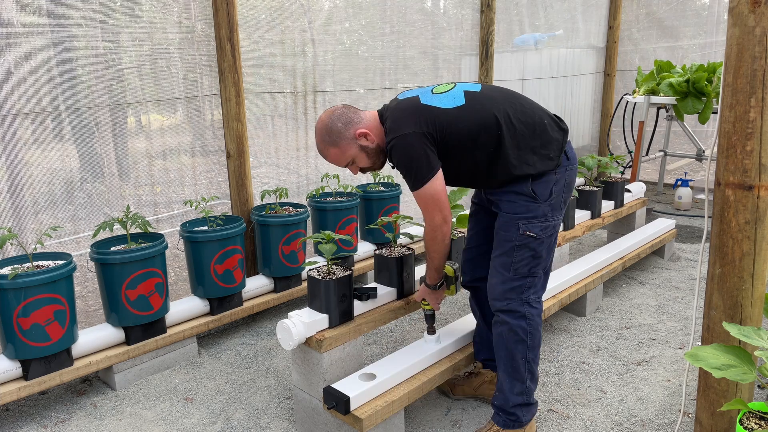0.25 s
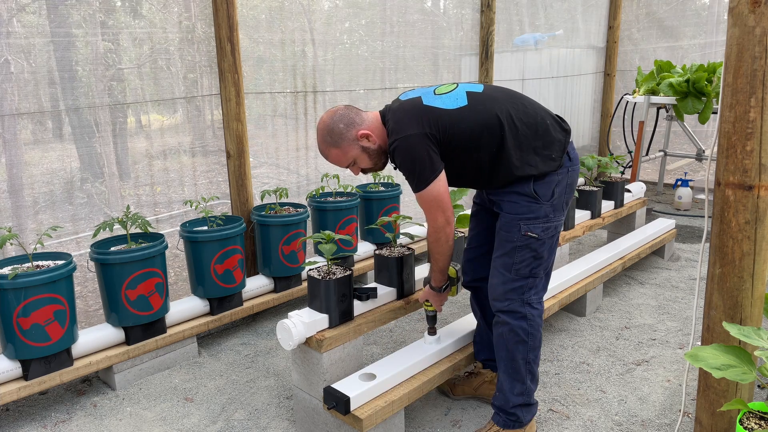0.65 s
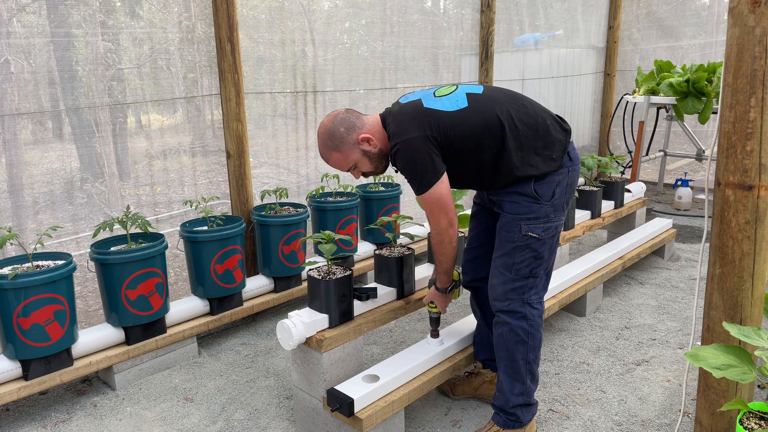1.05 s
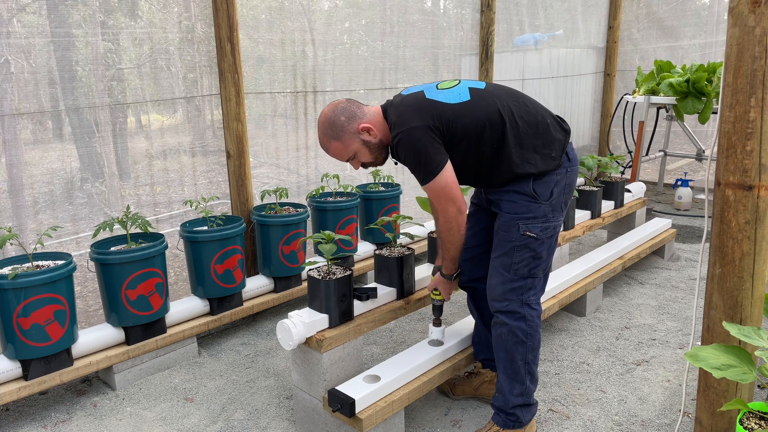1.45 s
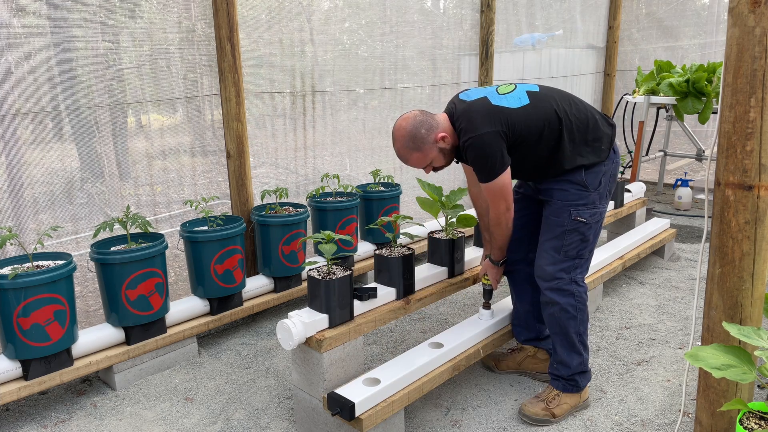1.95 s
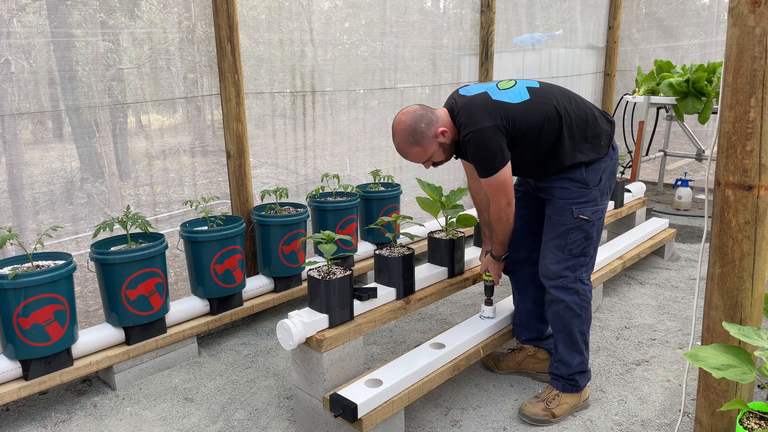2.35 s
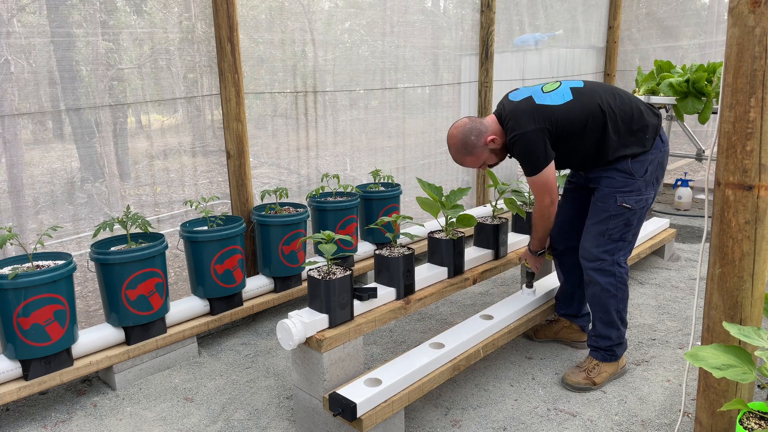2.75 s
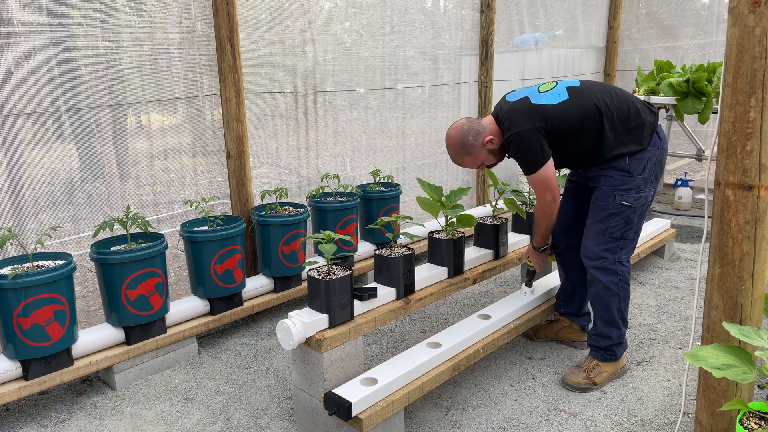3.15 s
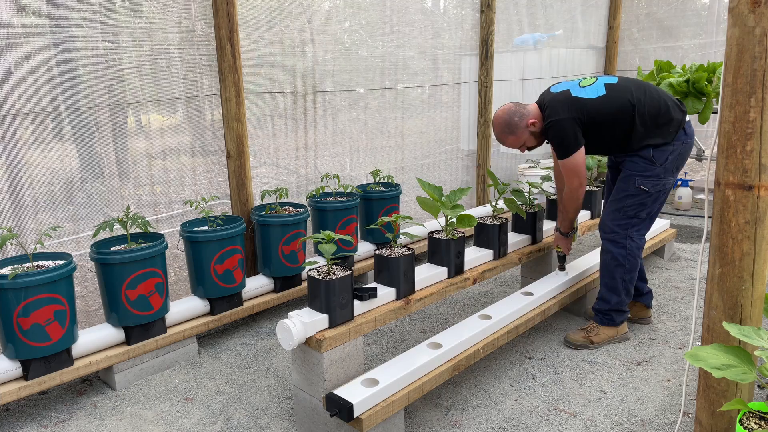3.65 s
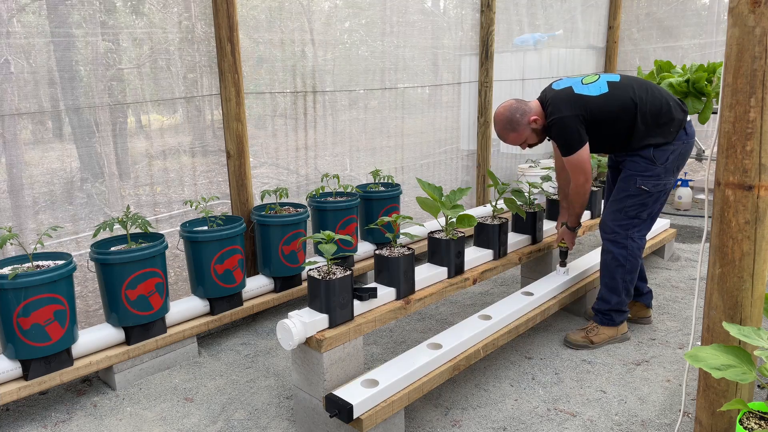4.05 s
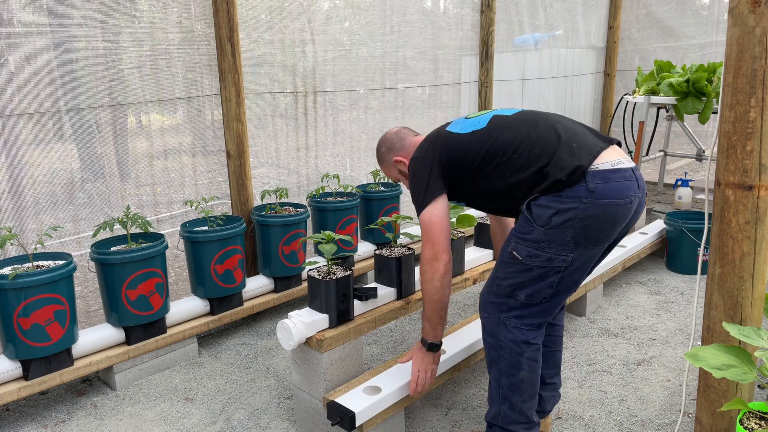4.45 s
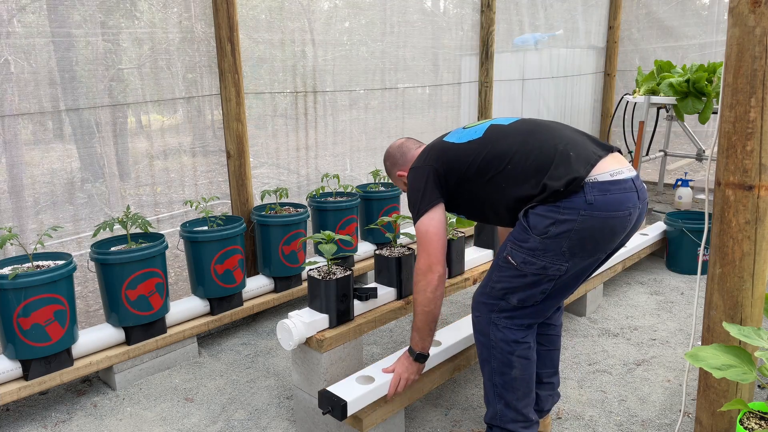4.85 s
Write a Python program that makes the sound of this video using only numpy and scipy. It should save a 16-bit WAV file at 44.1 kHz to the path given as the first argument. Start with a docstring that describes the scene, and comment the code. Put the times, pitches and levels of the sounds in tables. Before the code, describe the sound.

A cordless drill drives a hole saw through plastic pipe four times in a greenhouse. Each run starts abruptly with rasping teeth and hollow drumming, breaks through into a free whine, then slows and stops with a metallic clack. Afterwards a boot scuffs gravel, clothes rustle and the pipe shifts with dull bumps. Faint birds and a low pump hum sit over soft outdoor air.

```python
"""A cordless drill with a hole saw cuts four holes in a plastic pipe in a greenhouse.
Each run starts abruptly, mid-cut: the teeth rasp and drum on the hollow pipe, then break through.
The motor runs free, slows, and the spindle lock (the catch that holds the shaft still) clacks.
After the last hole a hand shifts the pipe, a boot scuffs the gravel, clothes rustle and a small
pump's hum fades in. Faint birds call, mostly near the end; soft outdoor air is heard throughout."""
import sys
import numpy as np
from scipy import signal
from scipy.fft import rfft, irfft, next_fast_len
from scipy.io import wavfile

SR = 44100
rng = np.random.default_rng(int(sys.argv[2]) if len(sys.argv) > 2 else 0)


def master_out(mix):
    """Clip the mix to full scale and print it as 16-bit PCM to the path in sys.argv[1]."""
    frames = np.transpose(np.atleast_2d(mix))
    ceiling = np.clip(frames, -1, 1)
    pcm = np.round(ceiling * 32767).astype(np.int16)
    wavfile.write(sys.argv[1], SR, pcm)


N = 225351
T = np.arange(N) / SR

# Levels in all tables are relative; fade_s is the time a sound takes to fall by 60 dB.
# each hole: start_s, through_s, throb_db, cup_db, judder_db, mesh_db, whine_db, vent_db
HOLES = [(0.148, 0.885, 2.5, -25, -8.5, -14, -10.5, -15), (1.615, 1.972, -1, -27, 2.5, -8, -14.5, -30.5),
         (2.514, 2.822, 0.5, -1.5, -0.5, -6.5, -21, -29.5), (3.348, 3.55, -0.5, -19, -4, -18, -14.5, -25.5)]
# a boot on gravel: start_s, level_db, fade_s
STEPS = [(4.115, -37.5, 0.2), (4.14, -44, 0.21), (4.168, -30, 0.14), (4.196, -41.5, 0.091),
         (4.23, -55, 0.97)]
MESH_ORDER = 12  # gear teeth meet this often per motor turn, making the "mesh" tone


def amp(db):
    """Turn decibels into a gain."""
    return 10 ** (np.asarray(db) / 20)


def unit(x):
    """Scale x to an average (rms) level of 1."""
    return x / np.sqrt(np.mean(x ** 2) + 1e-20)


def along(points, hz):
    """Read between (pitch_hz, value) points on a log pitch scale."""
    pitches, values = np.transpose(points)
    return np.interp(np.log(hz + 1), np.log(pitches + 1), values)


def wobble(rate):
    """A wandering curve through `rate` random points a second."""
    knots = rng.standard_normal(4096)
    return np.interp(T * rate, np.arange(len(knots)), knots)


def filtered(x, response):
    """Scale each frequency in x by response(hz)."""
    size = next_fast_len(N + SR // 4)
    return irfft(rfft(x, size) * response(np.fft.rfftfreq(size, 1 / SR)), size)[:N]


def noise(spectrum):
    """Noise with a (pitch_hz, level_db) tone colour."""
    return unit(filtered(rng.standard_normal(N), lambda hz: amp(along(spectrum, hz))))


def resonate(x, modes, low_hz=190):
    """Let x ring in a body too small to give off bass."""
    def response(f):
        body = sum((-1) ** k * amp(db) * 1j * f * width / (hz * hz - f * f + 1j * f * width)
                   for k, (hz, width, db) in enumerate(modes))
        bass_cut = (f * f / (low_hz ** 2 - f * f + 1j * f * low_hz)) ** 2
        return body * bass_cut
    return filtered(x, response)


def dying(start, fade_s, rise_s=0.0027):
    """Silence until start, a quick rise, then a fade."""
    age = np.maximum(T - start, 0)
    return (1 - np.exp(-age / rise_s)) * amp(-60 * np.minimum(age / fade_s, 3))


def air_and_pump():
    """Outdoor air rushes softly; a pump's hum fades in from the first scuff of the boot."""
    pump = [(64.6, -67), (96.9, -65), (129.2, -76), (161.5, -85), (183.0, -67.5)]  # tones of the hum: pitch_hz, level_db
    air = [(15, -27.5), (25, -16), (102, -7.5), (236, -15.5), (659, -16.5), (1610, -28), (2550, -24.5),
           (4030, -27), (4490, -26.5), (4870, -30.5), (10400, -38), (16000, -43)]  # colour of the air: pitch_hz, level_db
    hum = sum(amp(db + wobble(4.2)) * np.sin(2 * np.pi * hz * T) for hz, db in pump)
    fade_in = np.clip((T - STEPS[0][0]) / 0.55, 0, 1)
    return amp(-60 + wobble(1.75)) * noise(air) + hum * fade_in


def greenhouse(x):
    """The short echo of x from the plastic walls."""
    room = [(200, 0.47), (1000, 0.28), (4000, 0.16), (14000, 0.11)]  # length of the echo: pitch_hz, fade_s
    hz, t, spectra = signal.stft(rng.standard_normal(SR // 2), SR, nperseg=256)
    tail = signal.istft(spectra * amp(-60 * t / along(room, hz)[:, None]), SR, nperseg=256)[1]
    return signal.fftconvolve(np.pad(x, (300, 0)), tail / np.linalg.norm(tail))[:N]


def birds(blur=0.0155, octave_db=-14):
    """Faint gliding whistles from outside, each with a weak octave."""
    calls = [(2.411, 0.041, 2850, 3940, -56), (4.239, .12, 4440, 4300, -64),
             (4.365, 0.23, 10400, 10200, -73), (4.56, 0.13, 2850, 3470, -67),
             (4.608, 0.19, 3470, 4100, -61.5), (4.773, .25, 10370, 10150, -78),
             (4.94, 0.13, 4530, 4370, -69)]  # whistles: start_s, length_s, from_hz, to_hz, level_db
    out = np.zeros(N)
    for start, length, from_hz, to_hz, db in calls:
        progress = np.clip((T - start) / length, 0, 1)
        pitch = (from_hz + (to_hz - from_hz) * progress) * (1 + blur * wobble(340))
        phase = 2 * np.pi * np.cumsum(pitch) / SR
        out += amp(db) * np.sin(np.pi * progress) * (np.sin(phase) + amp(octave_db) * np.sin(2 * phase))
    return out


def worker(crunch_db=3, rustle_db=-1):
    """A boot crunches on gravel; clothes rustle as the worker straightens and reaches."""
    gravel = [(41, -57), (70, -28), (275, -6.5), (441, -13), (661, 1), (1520, -14), (1820, -20),
              (2600, -15), (2780, -20), (3730, -20.5), (5710, -29), (15000, -41.5)]  # colour of the crunch: pitch_hz, level_db
    cloth = [(880, -3.5), (1500, -15), (2550, -14), (3030, -8), (3270, -2.5), (3670, -6.5), (4860, -17),
             (9180, -28), (10400, -24), (15000, -33)]  # colour of the rustle: pitch_hz, level_db
    moves = [(4.321, 0.114, -63), (4.623, 0.084, -55.5), (4.878, 0.24, -73.5)]  # body movements: middle_s, half_length_s, level_db
    stepping = sum(amp(db) * dying(start, fade_s) for start, db, fade_s in STEPS)
    crunch = unit(noise(gravel) * amp(crunch_db * wobble(400)))
    moving = sum(amp(db + rustle_db) * np.exp(-((T - middle) / half) ** 2) for middle, half, db in moves)
    rustle = unit(noise(cloth) * amp(2.5 * wobble(70)))
    return stepping * crunch + moving * rustle


def knocks(events, modes, gain_db, rattle, rattle_s):
    """Blows ring the pipe, each with a short rattle where it is hit."""
    blows = np.zeros(N)
    for start, db in events:
        blows[round(start * SR)] += amp(db)
        blows += amp(db) * rattle * dying(start, rattle_s) * rng.standard_normal(N)
    peak = np.abs(resonate(signal.unit_impulse(N), modes)).max()
    return amp(gain_db) * resonate(blows, modes) / peak


def pipe_shoves(slip_s=0.038, scatter=0.2, fade_db_per_s=39):
    """Shoved along its plank, the pipe sticks and slips, each bump weaker."""
    shoves = [(3.922, 0.07, -30), (4.644, 0.13, -33), (4.869, 0.07, -41)]  # pushes of the hand: start_s, length_s, first_bump_db
    thud = [(356, 47, 0)]  # the pipe's dull ring: pitch_hz, width_hz, level_db
    bumps = []
    for start, length, db in shoves:
        gaps = slip_s * np.exp(scatter * rng.standard_normal(size=12))
        ages = np.cumsum(gaps) - gaps[0]
        bumps += [(start + age, db - fade_db_per_s * age) for age in ages if age < length]
    return knocks(bumps, thud, gain_db=-5.5, rattle=0.083, rattle_s=0.11)


def saw_snags():
    """The saw catches and bumps the pipe."""
    snags = [(0.091, -28), (0.832, -13), (1.245, -20), (1.924, -9.5), (1.959, -2), (2.235, -2.5),
             (2.254, -7.5), (2.279, -17.5), (2.48, -35.5), (2.818, -4), (3.135, -10), (3.214, -17.5),
             (3.534, -27)]  # bumps: start_s, level_db
    ring = [(333, 15, 6.5), (606.4, 30.6, 9.5), (920, 84, -0.5)]  # the pipe's hollow ring: pitch_hz, width_hz, level_db
    return knocks(snags, ring, gain_db=-8.0, rattle=0.077, rattle_s=0.082)


def lock_clacks(crack_db=-4, ring_db=-15, crack_s=0.03, ring_s=0.045, rise_s=0.00021, treble_hz=6500):
    """The spindle lock slams and rebounds: a crack and a short steel ring."""
    clacks = [(0.0014, -13, -9.5), (1.4188, -15, -10.5), (1.4213, -19.5, -2.5), (1.4442, -23.5, 1.5),
              (1.4727, -30, -15), (2.2907, -20, 0), (2.3159, -13.5, -3.5), (2.3504, -28, 0.5),
              (3.1335, -7, 0), (3.1488, -11, -5), (3.2822, -38.5, -9), (3.923, -18, -10.5),
              (4.0122, -33.5, -11)]  # blows of the lock and chuck: start_s, level_db, treble_db
    steel = [(1693, -5.5, 0.097), (2378, -18, 0.052), (4280, -15.5, 0.12), (4800, -24, 0.14),
             (7970, -2, 0.086), (9190, 0.5, 0.036), (8900, -18, 0.089), (12040, -11.5, 0.091),
             (11900, -9, 0.057), (12610, -18.5, 0.12), (12500, 0.5, 0.086), (14300, -9.5, 0.097),
             (14600, -5, 0.073), (15670, -14.5, 0.06)]  # tones of the steel: pitch_hz, level_db, fade_s (capped at ring_s)
    crack_colour = [(530, 1), (900, -2), (1090, -9.5), (1790, -5.5), (2570, 0), (3860, -4), (4860, -3.5),
                    (6560, -10), (7310, -1.5), (8660, -10), (9880, -2.5), (11100, -9), (14700, -7),
                    (16000, -27.5)]  # colour of the crack: pitch_hz, level_db
    t = np.arange(SR // 4) / SR
    out = np.zeros(N + SR)
    rise = 1 - np.exp(-t / rise_s)
    grit = noise(crack_colour)
    treble = np.fft.rfftfreq(len(t), 1 / SR) > treble_hz
    for start, db, treble_db in clacks:
        at = round(start * SR)
        detune = 1 + 0.017 * rng.standard_normal()
        ring = sum(amp(level + rng.uniform(-2, 2) - 60 * t / min(fade_s, ring_s))
                   * np.sin(2 * np.pi * (hz * detune * t + rng.random())) for hz, level, fade_s in steel)
        crack = amp(crack_db - 60 * t / crack_s) * grit[at:at + len(t)]
        blow = rise * (amp(ring_db) * ring + crack)
        out[at:at + len(t)] += amp(db) * irfft(rfft(blow) * amp(treble * (treble_db + 1)), len(t))
    # small steel parts give off no bass
    return signal.sosfilt(signal.butter(2, 500, "high", fs=SR, output="sos"), out[:N])


def load(through, free_s=0.013):
    """1 while the saw cuts, falling to 0 as it breaks through."""
    return .5 - .5 * np.tanh((T - through) / free_s)


def mesh_pitch(lowest_hz=2000.0, spin_up_hz=170.2, spin_up_s=0.07, coast_hz_per_s=3900):
    """The gear tone sags in the cut, leaps as the saw breaks through and falls with the trigger off."""
    speeds = [(3528, 190, 3640, 1.095), (3186, 120, 3625, 2.135), (3112, 160, 3575, 3.007),
              (3090, 340, 3545, 3.705)]  # gear tone at each hole: loaded_hz, sag_hz_per_s, free_hz, let_go_s
    pitch = np.full(N, lowest_hz)
    for (start, through, *_), (loaded_hz, sag, free_hz, let_go) in zip(HOLES, speeds):
        loaded = loaded_hz - sag * (T - start)
        free = free_hz - spin_up_hz * np.exp(-np.maximum(T - through, 0) / spin_up_s)
        coast = coast_hz_per_s * np.maximum(T - let_go, 0)
        pitch = np.where(T >= start, free + load(through) * (loaded - free) - coast, pitch)
    return np.maximum(pitch, lowest_hz)


def motor_tones(shaft, orders, flutter_db=2):
    """Tones at whole multiples of the motor's speed, each fluttering by itself."""
    return sum(amp(db + flutter_db * wobble(45)) * np.sin(2 * np.pi * order * shaft + .4 * wobble(130))
               for order, db in orders)


def gear_whine(shaft, speed):
    """Motor and gears sing through the casing, more softly when slow."""
    gears = [(4, -14.5), (5, -14), (12, -0.5), (15, -1.5), (16, -7), (17, -2.5), (20, -0.5), (21, -2),
             (22, -0.5), (24, -10), (25, -12.5), (26, 0), (27, -20), (30, -15), (32, -15), (35, -12.5),
             (36, -9.5), (37, -11)]  # motor and gear tones: cycles_per_turn, level_db
    casing = [(1200, 5), (2700, 5), (3500, 4), (6900, -1.5), (7650, 7), (8400, -16.5), (15000, 18)]  # colour of the casing: pitch_hz, gain_db
    return filtered(motor_tones(shaft, gears), lambda hz: amp(along(casing, hz))) * speed ** 2


def saw_judder(carrier_turns, wander=0.67):
    """A low buzz: the saw jerks once per turn of the gearbox's first gear carrier."""
    return sum(np.sin(2 * np.pi * (k * carrier_turns + rng.random()) + wander * wobble(25))
               for k in range(2, 20))


def tooth_bites(turns, count=30, set_error=0.32, scatter=0.12, wear_db=2, bite_db=3.0):
    """One push per passing tooth; its own offset and wear return every turn, blurred by chance."""
    tooth = np.floor(turns * count).astype(int)
    passes = np.flatnonzero(np.diff(tooth) > 0)
    offset, wear = rng.standard_normal((count, 2))[tooth[passes] % count].T
    late, depth = rng.standard_normal((len(passes), 2)).T
    delay = (set_error * offset + scatter * late) * np.gradient(passes)
    at = np.clip(passes + delay, 0, N - 1).astype(int)
    return np.bincount(at, amp(wear_db * wear + bite_db * depth), N)


def torn_chips(bites, grit=0.34, chip_s=0.0011):
    """Every bite tears a chip: a short jump in the level of the rasp."""
    chips = unit(signal.lfilter([1], [1, -np.exp(-1 / (chip_s * SR))], bites))
    return unit(1 + grit * chips)


def through_pipe(x, spectrum, spread_s=.012):
    """The pipe colours x; its bending wall carries low notes later than high ones."""
    middle_hz = spectrum[len(spectrum) // 2][0]
    lag = lambda hz: np.exp(-2j * np.pi * spread_s * np.sqrt(hz * middle_hz))
    return unit(filtered(x, lambda hz: amp(along(spectrum, hz)) * lag(hz)))


def pressure_db(start, through, bite_db, break_db, bite_s=0.17, break_s=0.023):
    """The teeth press harder or softer at the first bite and in the last sliver of wall."""
    first_bite = bite_db * np.exp(-np.maximum(T - start, 0) / bite_s)
    return first_bite + break_db * np.exp(-np.abs(T - through) / break_s)


def drill(gear_ratio=14.4, carrier_ratio=3.367, muffled_db=-4, settle_db_per_s=40,
          rise_s=0.0032, brake_fade_s=0.022):
    """Four runs: the teeth drum on the pipe and tear chips until the saw breaks through and spins free."""
    # pressure on the saw at each hole: drum_db, bite_db, break_db, scrape_db, shake_db, spin_db
    efforts = [(-32, 6.5, 7.5, -33, -37.5, -35.5), (-19.5, -2.5, 2, -31, -30.5, -34),
               (-22, 2, -1.5, -27, -34, -31.5), (-24, -4, -2, -30.5, -35, -33.5)]
    grips = [(-20, -5), (-6, -12), (-7, -1.5), (-7.5, -3.5)]  # the drill as held at each hole: brush_db, coast_db
    brakes = [1.42, 2.321, 3.148, 3.93]  # the end of each run: stop_s
    pipes = [
        [(65, -61), (110, -27), (180, -17), (246, 0), (292, -8), (337, 1), (441, -7), (483, 0.5), (522, -10),
         (730, -3), (914, -17.5), (1410, -19.5), (1600, -29), (2080, -57), (3520, -120)],
        [(65, -56), (110, -20), (176, -31), (206, 5.5), (258, -19.5), (357, 9), (422, -8.5), (467, -4),
         (571, -13), (611, 0), (691, 4), (935, -15), (1070, -20), (1600, -24.5), (2080, -48.5), (3520, -120)],
        [(65, -58), (110, -17.5), (166, -26), (211, -6), (258, -16.5), (295, -1.5), (461, -7), (499, -14.5),
         (604, -4), (864, -10), (977, -24), (1400, -19), (1600, -47), (2080, -59), (3520, -120)],
        [(65, -59), (110, -15), (161, -27), (204, -4.5), (276, -10), (333, 0.5), (386, -3), (417, -6.5),
         (675, -1), (826, -13), (1000, -10), (1110, -19), (1600, -19), (2080, -52), (3520, -120)],
    ]  # colour of the hollow pipe at each hole: pitch_hz, level_db
    rasps = [
        [(530, -43), (900, -6), (1420, -7), (1720, -4.5), (3150, 1), (3380, -2.5), (4010, -4.5), (6970, -5),
         (7490, -5.5), (8250, -8.5), (13000, -13), (14900, -23), (16000, -21.5)],
        [(530, -42.5), (900, -4.5), (1070, -19.5), (1530, -31.5), (1680, -11), (2660, -10.5), (3110, -7),
         (4050, -18.5), (4860, -10), (5820, -16), (8150, -10), (10000, -22.5), (16000, -24.5)],
        [(530, -21), (900, -2.5), (979, -14), (1410, -14.5), (1640, -11), (2450, -5), (3110, -1.5),
         (3860, -14.5), (4250, -11), (7060, -11.5), (8050, -5.5), (9880, -16.5), (16000, -24.5)],
        [(530, -34.5), (900, -6.5), (1360, -8), (1770, -13.5), (2330, -2), (2830, -7.5), (3190, 2.5),
         (3770, -20.5), (4250, -6), (5480, -16.5), (7580, -8), (14700, -26.5), (16000, -27)],
    ]  # colour of the rasp at each hole: pitch_hz, level_db
    shaken_colour = [(65, -67), (110, -13), (167, -27), (205, -1.5), (236, -12.5), (332, 4.5), (441, -11.5),
                     (605, -6.5), (713, -15.5), (778, -10), (1500, -30), (1950, -27.5), (3300, -120)]  # the pipe shaken by the free saw: pitch_hz, level_db
    whirr_colour = [(410, -31), (700, 0), (798, -1.5), (1040, -4.5), (1310, 1.5), (1660, -10.5), (2330, 3),
                    (3500, -0.5), (4100, -6.5), (6920, -0.5), (7490, -3.5), (12800, -11), (15000, -12.5),
                    (16000, -13)]  # the drill running free: pitch_hz, level_db
    brush_ring = [(7700, 390, 0)]  # motor brushes hiss in the casing: pitch_hz, width_hz, level_db
    vent_ring = [(15000, 600, 0)]  # cooling air in the vents: pitch_hz, width_hz, level_db
    cup_ring = [(3030, 230, 6.5), (3394, 170, 0.5)]  # the saw's steel cup: pitch_hz, width_hz, level_db
    rubs = [(0.965, -43.5, 0.35), (1.24, -26, 0.12), (2.228, -26.5, 0.55), (3.095, -33.5, 0.5)]  # the saw rubs the rim on its way out: start_s, level_db, fade_s

    pitch = mesh_pitch()
    speed = pitch / pitch.max()
    shaft = np.cumsum(pitch * (1 + 0.0018 * wobble(90) + 0.001 * wobble(12))) / SR / MESH_ORDER
    saw_turns = shaft / gear_ratio
    tones = gear_whine(shaft, speed)
    mesh = motor_tones(shaft, [(MESH_ORDER, 0)])
    # as the motor slows, the mesh tone passes a pitch at which the casing rings
    singing = 1 / (1 + ((pitch - 2760) / 310) ** 2)
    bites = tooth_bites(saw_turns)
    judder = saw_judder(shaft / carrier_ratio)
    tearing = torn_chips(bites)
    brushes = amp(3.3 * wobble(40)) * unit(resonate(rng.standard_normal(N), brush_ring))
    whirr = noise(whirr_colour)
    beating = unit(amp(1.3 * np.sin(2 * np.pi * shaft) + 0.8 * wobble(220)))
    vents = unit(resonate(rng.standard_normal(N), vent_ring))
    shaken = through_pipe(bites, shaken_colour)
    rattle_db = 1.5 * wobble(29.61)
    rubbing = sum(amp(db) * dying(start, fade_s) for start, db, fade_s in rubs)
    # the saw sits askew, so its level throbs once a turn
    askew = 2 * np.cos(np.pi * (saw_turns - np.interp(.24, T, saw_turns))) ** 4 - 1
    cup = unit(resonate(rng.standard_normal(N), cup_ring) * amp(wobble(45)))

    out = np.zeros(N)
    for hole, brake, effort, grip, pipe, rasp in zip(HOLES, brakes, efforts, grips, pipes, rasps):
        start, through, throb_db, cup_db, judder_db, mesh_db, whine_db, vent_db = hole
        drum_db, bite_db, break_db, scrape_db, shake_db, spin_db = effort
        brush_db, coast_db = grip
        cutting = load(through)
        cut, free = np.sqrt(cutting), np.sqrt(1 - cutting)
        throb = throb_db * askew
        drum = unit((through_pipe(bites, pipe) + amp(judder_db) * through_pipe(judder, pipe)) * amp(throb))
        drum *= cut * amp(drum_db + pressure_db(start, through, bite_db, break_db))
        settling = amp(shake_db + rattle_db - settle_db_per_s * np.maximum(T - through, 0))
        shake = free * (settling + rubbing) * shaken
        scrape = unit((noise(rasp) + amp(cup_db) * cup) * tearing * amp(0.38 * throb))
        spin = beating * unit(whirr + amp(brush_db) * brushes)
        hiss = amp(-1) * (cut * scrape + free * spin) + amp(vent_db) * vents
        # in the cut the mesh tone stands out and the other tones sink
        whine = amp(whine_db + muffled_db * cutting) * tones
        whine += (cut * amp(mesh_db) + free * amp(coast_db) * singing) * mesh
        strength = cutting * amp(scrape_db) + (1 - cutting) * amp(spin_db) * speed ** 1.68
        abrupt_start = np.clip((T - start) / rise_s, 0, 1)  # the sound comes in suddenly, mid-cut
        braking = amp(-60 * np.clip((T - brake) / brake_fade_s, 0, 3))
        out += abrupt_start * braking * (drum + shake + strength * (hiss + whine))
    return out


def scene():
    """Pipe, drill, worker and birds with their echo, over the air and the pump."""
    sounds = saw_snags() + pipe_shoves() + drill() + lock_clacks() + worker() + birds()
    return (sounds + amp(-14.5) * greenhouse(sounds) + air_and_pump())[None]


def record(dry):
    """Cut off the very highest treble."""
    return filtered(dry[0], lambda hz: hz < 16100)[None]


dry = scene()
out = record(dry)
master_out(out)
```